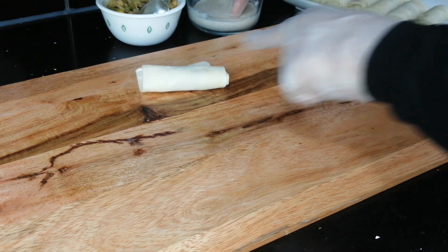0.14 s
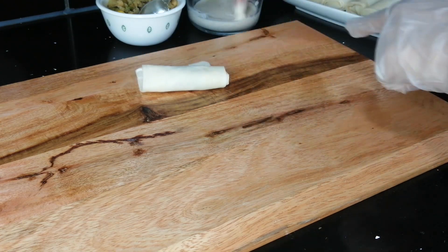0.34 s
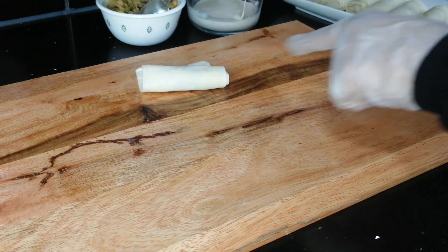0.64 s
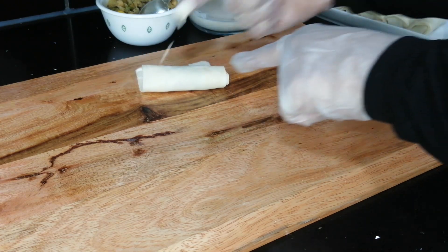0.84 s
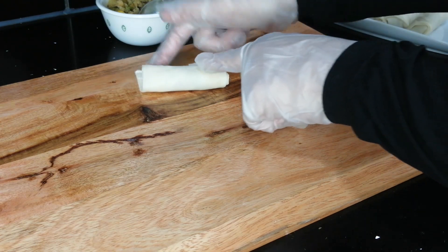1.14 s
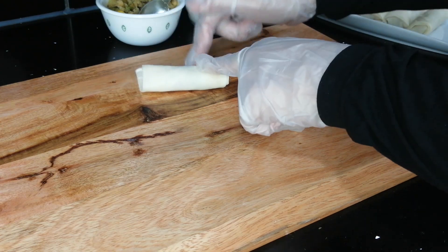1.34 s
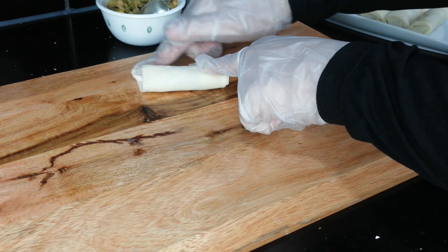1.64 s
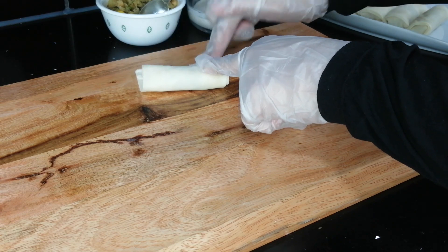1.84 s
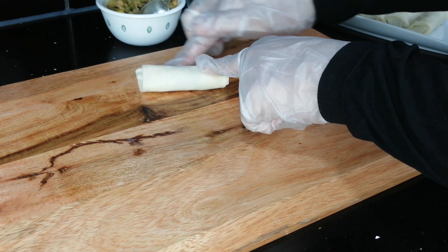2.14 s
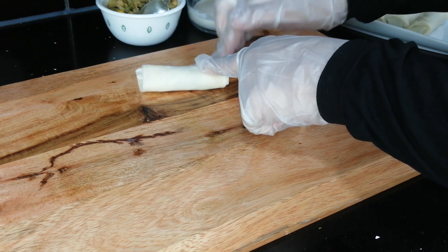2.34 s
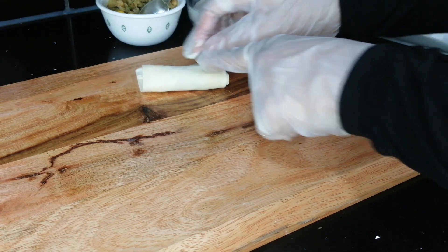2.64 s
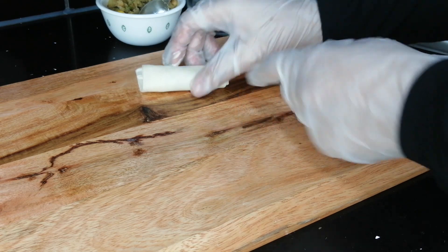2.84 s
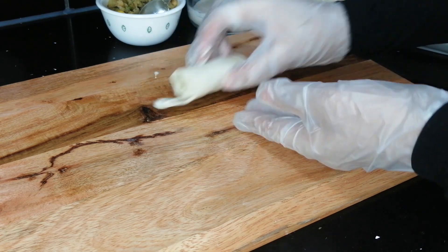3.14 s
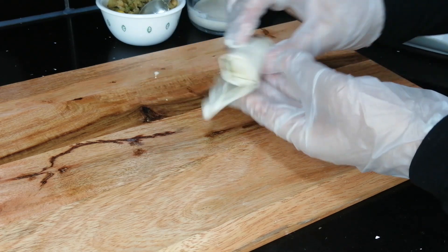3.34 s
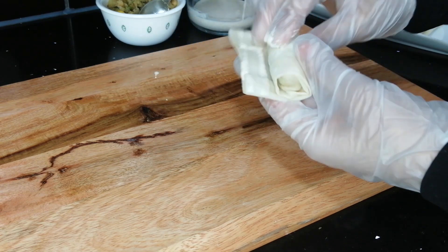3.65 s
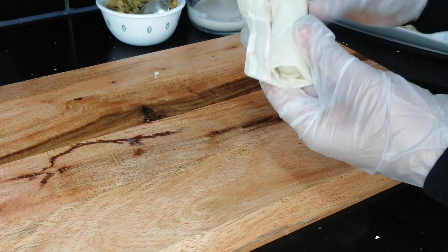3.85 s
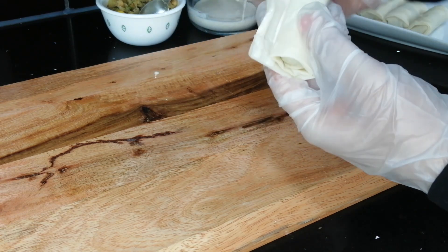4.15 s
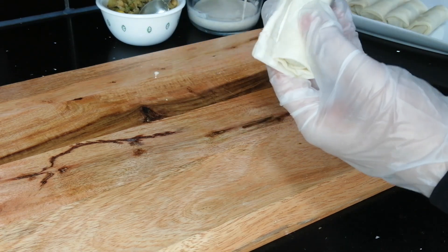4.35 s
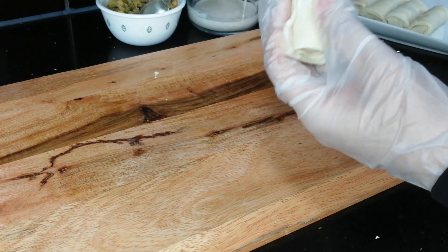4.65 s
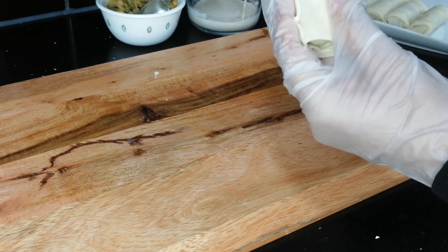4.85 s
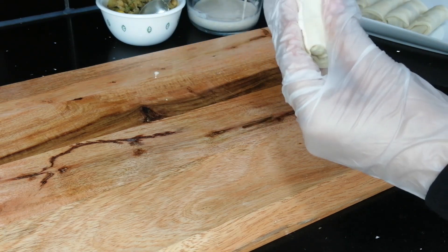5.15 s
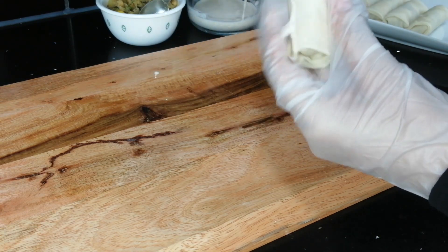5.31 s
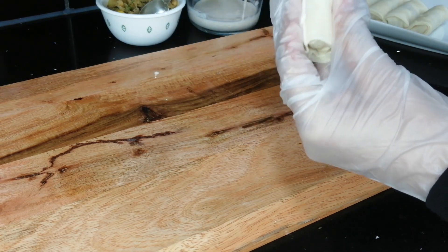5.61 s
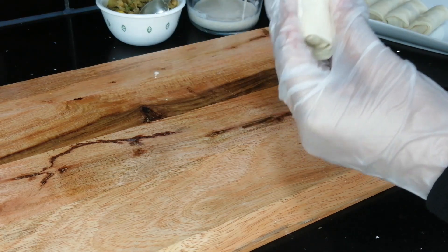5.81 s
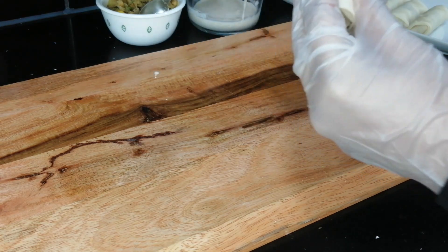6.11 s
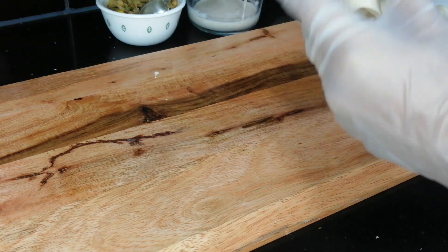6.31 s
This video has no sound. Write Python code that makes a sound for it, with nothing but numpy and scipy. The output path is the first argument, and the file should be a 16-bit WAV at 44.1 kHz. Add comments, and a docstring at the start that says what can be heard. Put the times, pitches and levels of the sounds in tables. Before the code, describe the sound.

Close, quiet handling sounds in a small, lightly reverberant kitchen: an appliance hums and blows steadily, then gloved fingers scrape and rub a pastry sheet, the thin film crackling with each move. Lifting and turning the roll brings busier crinkles, small snaps and brief squeaks, plus one muffled pat. Later moves are separate little rustles, rising again at the close. A faint hiss and narrow bandwidth colour everything.

```python
"""In a quiet kitchen, hands in thin plastic gloves seal and roll a pastry sheet over a wooden board.
The film rubs and crinkles in crowds of tiny toned clicks that swell with each move; its snaps are
short bursts of dying noise and its squeaks short wavering tones. Duller crowds of clicks make the
pastry, and shaped noise makes one soft pat. An appliance hums and blows steadily (wavering tones
and noise); a thin gliding whistle comes now and then."""
import sys
import numpy as np
from scipy import signal
from scipy.fft import rfft, irfft
from scipy.io import wavfile

SR = 44100
rng = np.random.default_rng(int(sys.argv[2]) if len(sys.argv) > 2 else 0)


def wav_out(sig):
    """Save sig, one row per channel (or a flat mono array), as 16-bit PCM at SR to the path in sys.argv[1]."""
    wavfile.write(sys.argv[1], SR, np.round(np.clip(np.atleast_2d(sig).T, -1, 1) * 32767).astype(np.int16))


N = 285541
TIME = np.arange(N) / SR  # seconds

# The tone tables all share one form. Each row: frequency in Hz, relative level in dB per Hz.
# Tone of the film's crinkling, and of the fingers rubbing.
CRINKLE_TONE = [(3300, -17), (4100, -18.5), (4800, -7.5), (5250, -1.5), (5600, -3.5), (6300, -4),
                (6900, -1.5), (7250, -4.5), (7550, -14.5), (7900, -32)]
RUB_TONE = [(900, -35), (1400, -20.5), (1900, -6.5), (2150, -5), (2550, -1), (3300, -0.5), (3900, -9),
            (4600, -11.5), (7500, -30.5)]

# Each move of the fingers swells and fades.
# Each row: peak time in seconds, length in seconds, crinkling level in dB, rubbing level in dB.
MOVES = [(1.421, 0.16, -77.5, -75.5), (1.582, 0.13, -66.5, -65), (1.971, 0.081, -59, -58.5),
         (2.188, .025, -76, -68), (2.237, 0.072, -72, -67), (2.347, 0.08, -80, -75), (2.529, .1, -59, -65),
         (2.72, 0.093, -70, -65), (2.942, 0.13, -62.5, -69), (3.074, 0.21, -62, -71),
         (3.434, 0.073, -60.5, -69.5), (3.525, 0.14, -59.5, -64), (3.8, 0.18, -68, -70.5),
         (4.135, 0.16, -65, -69.5), (4.217, .05, -75, -67.5), (4.265, 0.048, -64, -79),
         (4.368, 0.048, -60.5, -62), (4.493, 0.14, -72.5, -67), (4.614, .05, -60.5, -66),
         (4.738, .1, -66.5, -74), (5.152, 0.043, -64.5, -64), (5.314, .075, -66, -64.5),
         (5.398, 0.098, -59.5, -64.5), (5.549, .05, -70, -72.5), (5.708, 0.078, -69.5, -72),
         (5.896, 0.1, -69, -74.5), (5.992, 0.069, -69.5, -73), (6.15, 0.09, -64.5, -67.5),
         (6.35, 0.16, -58.5, -70), (6.465, .04, -57.5, -83)]
RISE_SHARE, ROUNDNESS = 0.44, 1.8  # part of a move spent rising; 1 = pointed top, 2 = bell

# Between moves the film keeps stirring, most while the roll is lifted and turned.
# Each row: time in seconds, crinkling level in dB.
STIRRING = [(1.3, -86), (1.73, -75.5), (2.1, -87.5), (2.65, -72), (2.83, -86), (3.15, -70.5), (4.25, -69),
            (4.85, -71.5), (4.97, -77.5), (5.23, -68), (5.62, -77), (6.07, -82.5), (6.4, -70)]
STIRRING_RUB_DB = -6  # rubbing during that stirring, relative to its crinkling

# Quick strokes of glove over glove. Each row: peak time in seconds, rise in seconds,
# fall in seconds, level in dB, treble tilt in dB per octave.
STROKES = [(1.7, 0.013, 0.017, -61.5, 0.5), (1.968, 0.027, 0.061, -56, -8.5),
           (2.235, 0.014, 0.029, -62, -9.5), (2.52, 0.028, 0.058, -56.5, -9.5),
           (2.622, 0.021, 0.026, -58.5, 2), (3.415, 0.012, 0.016, -57.5, 10),
           (4.394, 0.044, 0.0076, -51.5, -5), (5.402, 0.035, 0.012, -55.5, -5.5)]
STROKE_TONE = [(900, -34), (1400, -26.5), (1900, -16), (2200, -10.5), (2600, 2.5), (3350, -0.5),
               (4000, -6.5), (4600, 2.5), (5100, 3.5), (6200, 3.5), (7200, -3), (7800, -11.5)]

# Stretched film sings briefly as it slides.
# Each row: peak time in seconds, half length in seconds, pitch in Hz, level in dB.
SQUEAKS = [(1.704, 0.007, 4780, -62), (2.243, 0.0056, 3360, -69), (2.446, 0.016, 5200, -69.5),
           (2.62, 0.013, 3900, -67.5), (3.417, 0.0095, 5200, -65), (3.476, .018, 5160, -63.5),
           (3.539, 0.016, 5120, -68), (4.389, 0.011, 6100, -54.5), (4.39, 0.014, 7130, -59)]

# Creases that snap over. Each row: start in seconds, level of the flutter in dB, centre in Hz,
# time for the flutter to fall by 60 dB in seconds.
SNAPS = [(1.537, -65.5, 5500, .05), (1.964, -53, 5300, 0.039), (2.227, -67, 2960, .06),
         (3.027, -59, 6500, .07), (3.403, -55.5, 5900, 0.035), (3.772, -57, 6800, 0.11),
         (4.061, -61, 6070, 0.28), (4.117, -50, 6100, 0.05), (4.6, -69, 6100, .16), (4.684, -60, 6700, .07),
         (4.727, -54, 6600, 0.09), (5.141, -76, 5500, .12), (5.464, -56, 6460, 0.014),
         (6.115, -69, 5460, 0.092), (6.454, -72.5, 6200, .15)]

# The pastry sheet is pressed or folded. Each row: peak time in seconds, length in seconds, level in dB.
FOLDS = [(1.07, 0.28, -70), (2.0, .09, -67), (2.98, .25, -72), (3.72, 0.45, -67), (4.18, .15, -73)]
# Tone of the shuffling dough, of the fingertips scraping it, and of the pat.
DOUGH_TONE = [(200, -15), (380, 0), (650, 3.5), (1100, -7), (1800, -22.5), (3000, -37.5)]
SCRAPE_TONE = [(600, -12), (1000, -1.5), (1400, -7), (1850, -1.5), (2200, -6.5), (3000, -19.5), (4000, -27)]
PAT_TONE = [(110, -4), (180, 5), (300, 2), (550, -1), (950, -3), (1400, -16), (1850, -12), (2500, -13),
            (4000, -28)]
SCRAPE_DB = -5  # relative to the rubbing
SEALED_S, LET_GO_S = 3.7, 0.15  # the flap is folded shut; the scraping then fades over this many seconds
PAT_S, PAT_DB, PAT_T60 = 4.116, -52, 0.17  # a finger lands on the roll; seconds to fall by 60 dB

# Faint thin whistles. Each row: start in seconds, length in seconds, first pitch in Hz,
# last pitch in Hz, level in dB.
WHISTLES = [(0.438, 0.04, 4180, 4170, -75), (0.474, 0.12, 4120, 4200, -85), (0.898, 0.19, 4430, 4360, -84),
            (1.067, 0.24, 4420, 4700, -82.5), (4.867, 0.19, 3830, 3970, -79)]

# The appliance's mains buzz and motor lines. Each row: pitch in Hz, rms level in dB, unsteadiness from 0 to 1.
HUM = [(100, -44, 0.04), (44.04, -59.5, 0.5), (213.7, -75.5, 0.6), (245.2, -68, 0.4), (306.2, -75.5, 0.5),
       (383.3, -83.5, .5), (412, -93.5, 0.5), (486.8, -78, .5), (673.5, -83.5, 0.9)]
# Tone of its fan and the room, of the low rumble, and of the microphone hiss.
AIR_TONE = [(130, -8.5), (190, -6.5), (280, -2.5), (350, -9), (560, -7.5), (640, -14.5), (1000, -17.5),
            (1400, -24), (2200, -28), (3300, -27), (3900, -37), (4500, -41.5), (7800, -40)]
RUMBLE_TONE = [(10, -7), (22, -12.5), (30, -8.5), (45, -0.5), (75, -2.5), (90, -4.5), (130, -5.5),
               (190, -19.5)]
HISS_TONE = [(3900, -15), (4400, -7), (5300, -3), (6200, -6), (6800, 0.5), (7300, -9.5), (7800, -17)]
AIR_DB, RUMBLE_DB, HISS_DB = -63.5, -61, -79
EDGE_HZ = 7560  # the recorder keeps what lies below this


def handling():
    """How strongly the film crinkles and the fingers rub: the moves on top of changing background stirring."""
    stirring = level(*np.transpose(STIRRING))
    s, length, crinkling_db, rubbing_db = np.transpose(MOVES)
    crinkling = np.hypot(stirring, swells(zip(s, length, crinkling_db)))
    rubbing = np.hypot(amp(STIRRING_RUB_DB) * stirring, swells(zip(s, length, rubbing_db)))
    return crinkling, rubbing


def gloves(crinkling, rubbing, fizz_db=0.0, ticks_db=-13, rub_db=-0.2):
    """Wrinkles crackle high while the fingers rub lower down; a few larger creases tick out."""
    fizz = coloured(slips(per_s=15000, spread_db=1.5, clump_db=2.0, clump_hz=69.0), CRINKLE_TONE)
    ticks = coloured(slips(per_s=82, spread_db=2.5, clump_db=1.5, clump_hz=16), CRINKLE_TONE)
    rub = coloured(slips(per_s=4000, spread_db=1.0, clump_db=2.0, clump_hz=113), RUB_TONE)
    crackle = amp(fizz_db) * fizz + amp(ticks_db) * ticks
    return crinkling * crackle + rubbing * amp(rub_db) * rub


def strokes():
    """Each stroke is a swell of fast slips that dies as the fingers part."""
    out = np.zeros(N)
    for s, rise, fall, db, tilt_db in STROKES:
        speed = np.exp(-((TIME - s) / np.where(TIME < s, rise, fall)) ** 2)
        rustle = slips(per_s=7000, spread_db=1.1, clump_db=1.4, clump_hz=180)
        out += amp(db) * speed * coloured(rustle, STROKE_TONE, tilt_db)
    return out


def squeaks(width=0.0048):
    """Slips gather on one resonance of the taut film, made here as a short, shaky tone."""
    out = np.zeros(N)
    for s, half, hz, db in SQUEAKS:
        phase = 2 * np.pi * np.cumsum(hz * (1 + width * drift(400))) / SR
        tone = evened((1 + 0.34 * drift(220)) * np.sin(phase))
        out += amp(db) * np.exp(-((TIME - s) / half) ** 2) * tone
    return out


def snaps(crack=0.6, crack_t60=0.0076):
    """A crease flips with a tiny crack, and the film flutters after it: bursts of dying noise."""
    out = np.zeros(N)
    for s, db, hz, t60 in SNAPS:
        # the tone peaks at the centre and drops off on both sides
        tone = [(hz / 3, -24), (hz * 0.7, -12), (hz, 0), (hz * 1.15, -3), (hz * 1.3, -25)]
        film = coloured(rng.standard_normal(N), tone)
        out += amp(db) * film * (dying(s, t60) + crack * dying(s, crack_t60))
    return out


def pastry(rubbing):
    """The sheet shuffles dully as it folds, scrapes under the fingers, and takes one soft pat."""
    shuffle = coloured(slips(per_s=4300, spread_db=1.5, clump_db=-0.5, clump_hz=40.3), DOUGH_TONE)
    scrape = coloured(slips(per_s=7300, spread_db=2.0, clump_db=2.0, clump_hz=59), SCRAPE_TONE)
    touching = np.clip((SEALED_S - TIME) / LET_GO_S + 1, 0, 1)  # 1 until sealed, then down to 0
    pat = amp(PAT_DB) * dying(PAT_S, PAT_T60) * coloured(rng.standard_normal(N), PAT_TONE)
    return swells(FOLDS) * shuffle + amp(SCRAPE_DB) * touching * rubbing * scrape + pat


def whistles(waver=0.016, rough=0.5):
    """Thin, wavering glides, barely above the room."""
    out = np.zeros(N)
    for s, length, first_hz, last_hz, db in WHISTLES:
        progress = np.clip((TIME - s) / length, 0, 1)  # 0 at the start, 1 at the end
        hz = (first_hz + (last_hz - first_hz) * progress) * (1 + waver * drift(200))
        tone = np.sin(2 * np.pi * np.cumsum(hz) / SR)
        out += amp(db) * np.sin(np.pi * progress) * (1 + rough * drift(80)) * tone
    return out


def kitchen(x, t60=0.25, wet_db=-10, board=0.035, board_s=0.001302):
    """One close bounce off the board, then a short, light room tail of scattered echoes."""
    t = np.arange(SR // 2) / SR
    echoes = rng.choice([-1, 1], len(t)) * (rng.random(len(t)) < 2000 / SR)  # about 2000 per second
    taps = echoes * (t > 0.004) * amp(-60 * t / t60)
    response = amp(wet_db) * taps / np.linalg.norm(taps)
    response[0] += 1  # the direct sound
    response[round(board_s * SR)] += board
    return signal.fftconvolve(x, response / np.linalg.norm(response))[:N]


def appliance():
    """A steady mains hum, wavering motor lines, moving air and low rumble."""
    air = amp(AIR_DB) * coloured(rng.standard_normal(N), AIR_TONE)
    out = air + amp(RUMBLE_DB) * coloured(rng.standard_normal(N), RUMBLE_TONE)
    for hz, db, unsteady in HUM:
        # a complex waver shifts both loudness and phase
        waver = 1 - unsteady + unsteady * (drift(4.0) + 1j * drift(4.3))
        line = (waver * np.exp(2j * np.pi * (hz * TIME + rng.random()))).real
        out += amp(db) * evened(line)
    return out


def amp(db):
    """Turns decibels into a gain."""
    return 10 ** (np.asarray(db) / 20)


def evened(x):
    """Scales a sound to an average (rms) level of 1."""
    return x / np.sqrt(np.mean(x ** 2) + 1e-20)


def coloured(x, points, tilt_db=0):
    """Filters x by a tone table, tilted about 4 kHz in dB per octave, and scales it to rms 1."""
    octave = np.log2(np.fft.rfftfreq(N, 1 / SR) + 1)
    hz, db = np.transpose(points)
    shape = np.interp(octave, np.log2(hz), db, left=-70, right=-70) + tilt_db * (octave - 12)
    return evened(irfft(rfft(x) * amp(shape), N))


def drift(hz):
    """Slow random wandering of rms 1, up to about hz."""
    keep_slow = np.exp(-(np.fft.rfftfreq(N, 1 / SR) / hz) ** 2)
    return evened(irfft(rfft(rng.standard_normal(N)) * keep_slow, N))


def slips(per_s, spread_db, clump_db, clump_hz):
    """Tiny stick-slip clicks of uneven size that come in clumps."""
    size = amp(abs(spread_db) * np.minimum(rng.exponential(1, N), 4))
    clicks = size * rng.choice([-1, 1], N) * (rng.random(N) < per_s / SR)
    return clicks * amp(clump_db * drift(clump_hz))


def dying(s, t60):
    """A gain that jumps up at s and falls by 60 dB in t60 seconds."""
    return (TIME >= s) * amp(-60 * np.maximum(TIME - s, 0) / t60)


def level(s, db):
    """A gain that follows the points, practically silent (-120 dB) outside them."""
    return amp(np.interp(TIME, s, db, left=-120, right=-120))


def swell(s, length):
    """The gain of one hand movement: a rounded rise and a slower fall."""
    share = np.where(TIME < s, RISE_SHARE, 1 - RISE_SHARE)
    return np.exp(-abs((TIME - s) / (length * share)) ** ROUNDNESS)


def swells(rows):
    """The joint gain of overlapping movements, adding their powers."""
    return np.sqrt(sum((amp(db) * swell(s, length)) ** 2 for s, length, db in rows))


def scene():
    """The hands and whistles in the kitchen, over the appliance."""
    crinkling, rubbing = handling()
    hands = gloves(crinkling, rubbing) + strokes() + squeaks() + snaps() + pastry(rubbing)
    return (kitchen(hands + whistles()) + appliance())[None]


def record(dry):
    """The microphone's own hiss, then the recorder's narrow band."""
    heard = dry + amp(HISS_DB) * coloured(rng.standard_normal(N), HISS_TONE)
    low_pass = signal.firwin(201, EDGE_HZ, window=("kaiser", 8), fs=SR)
    return signal.oaconvolve(heard, low_pass[None], "same")


dry = scene()
out = record(dry)
wav_out(out)
```